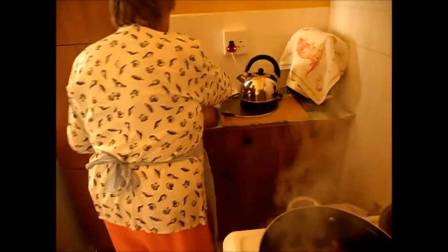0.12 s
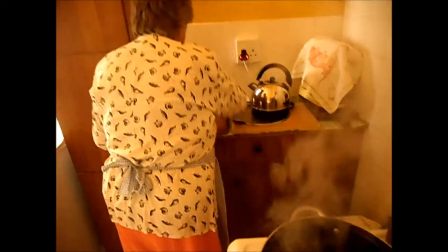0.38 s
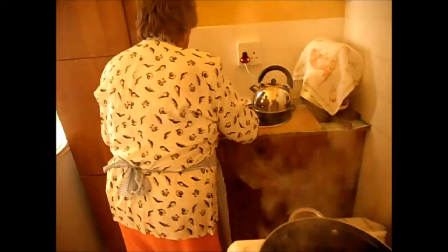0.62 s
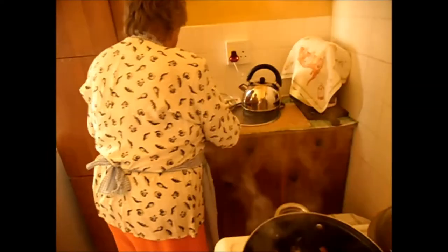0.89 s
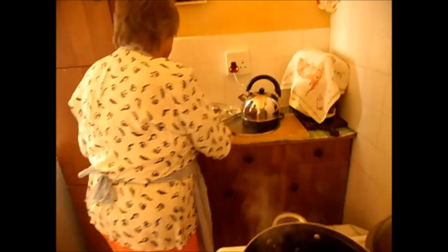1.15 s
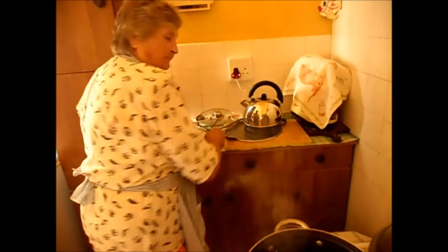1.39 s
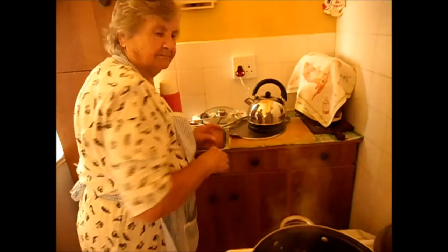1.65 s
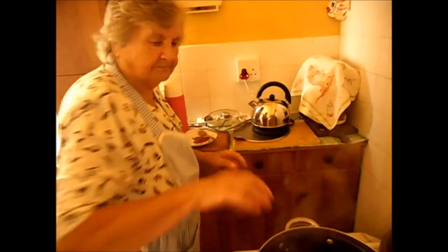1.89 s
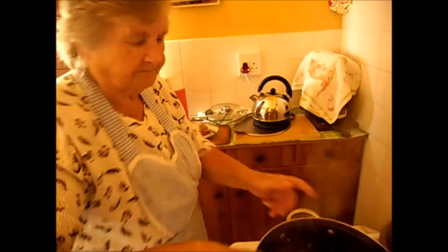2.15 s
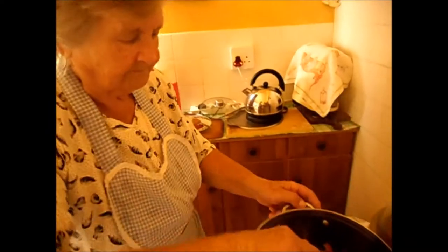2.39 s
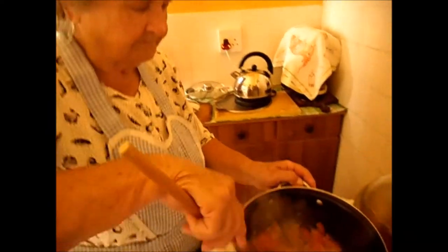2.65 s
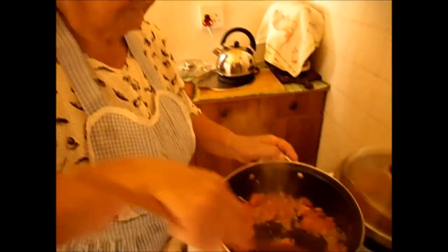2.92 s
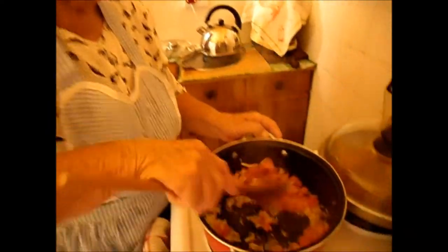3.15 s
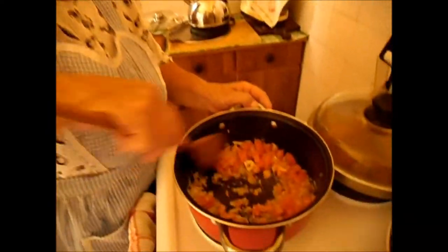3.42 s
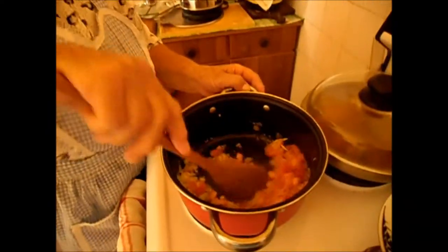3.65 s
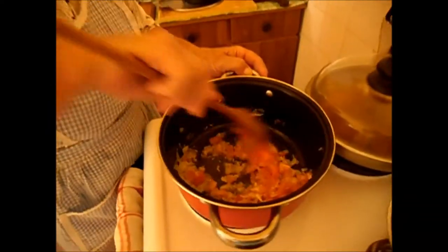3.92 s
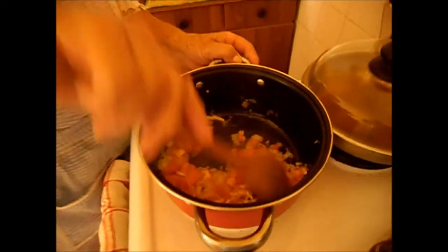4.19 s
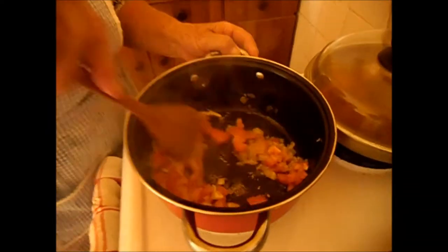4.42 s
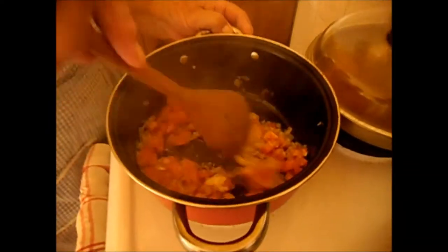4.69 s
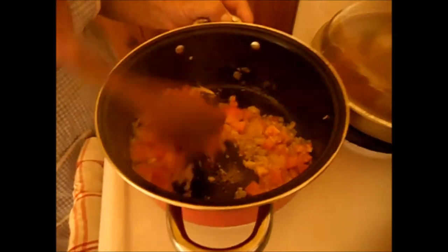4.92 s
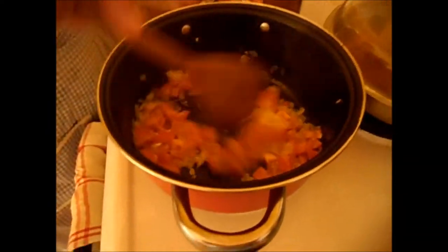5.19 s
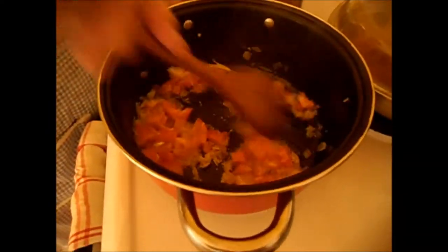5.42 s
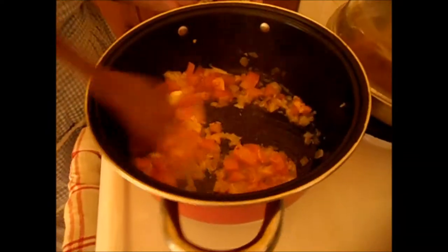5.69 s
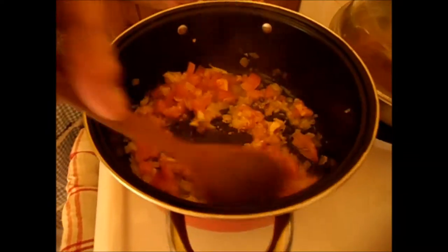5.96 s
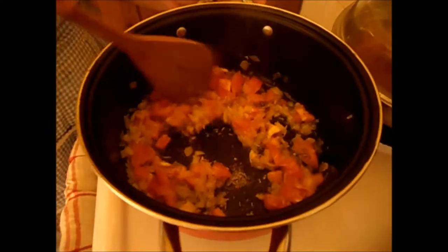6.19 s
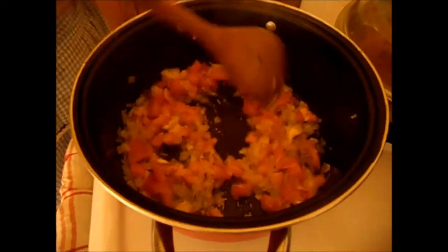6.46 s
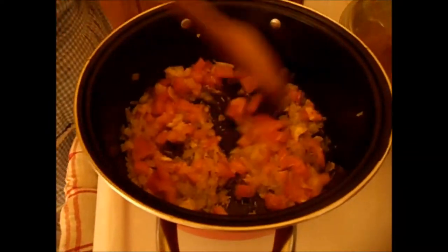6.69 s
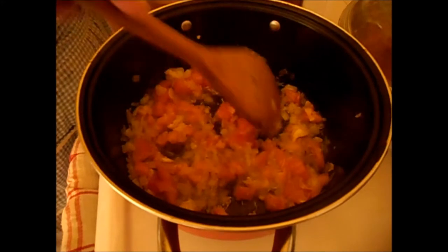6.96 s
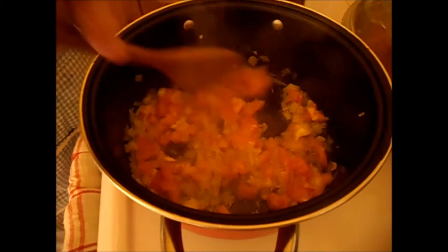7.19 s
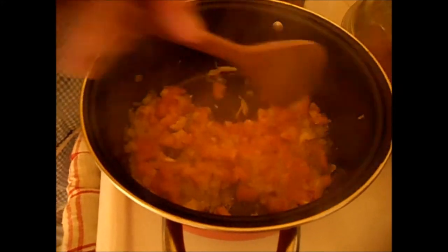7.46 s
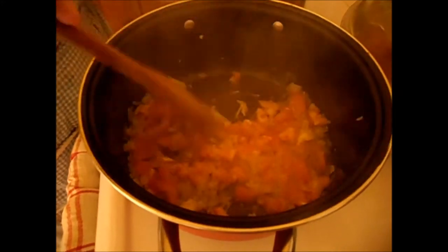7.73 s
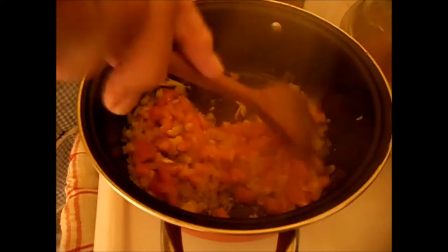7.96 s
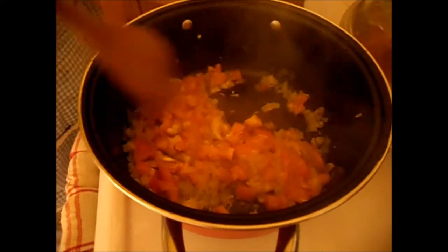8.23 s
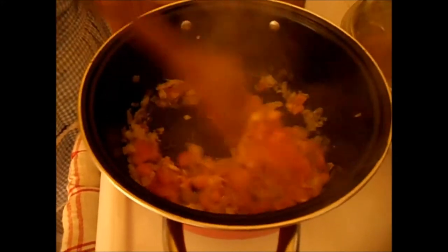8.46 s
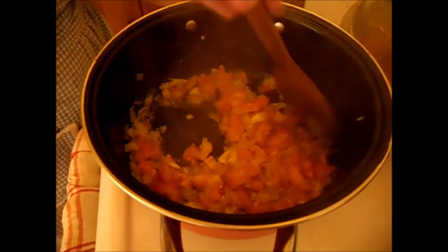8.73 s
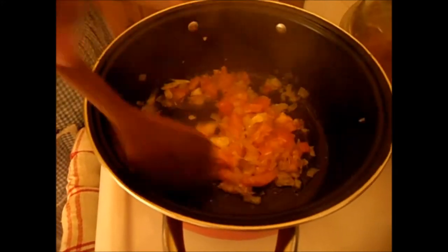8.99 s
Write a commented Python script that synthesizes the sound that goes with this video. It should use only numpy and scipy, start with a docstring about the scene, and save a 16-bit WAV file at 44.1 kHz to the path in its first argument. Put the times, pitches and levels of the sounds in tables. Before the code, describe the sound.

Vegetables sizzle steadily in oil in a metal pot while crockery clinks onto a wooden counter, then a wooden spoon knocks and clanks against the pot.

```python
"""Vegetables sizzle in oil in a metal pot: dense random bubble clicks and hiss, filtered for far and near.
The place is a tiled kitchen with a short noise tail; a small mono camera moves up close to the pot.
At first crockery, as ringing modes and noise bursts, is set down on a wooden counter, and lone oil pops
stand out as brief sine pulses. Then a wooden spoon stirs, striking the modes of the pot wall and floor.
The camera microphone stops near 8 kHz and the hardest knocks overload it."""
import sys
import numpy as np
from scipy import signal
from scipy.fft import rfft, irfft, next_fast_len
from scipy.io import wavfile
from scipy.ndimage import uniform_filter1d

SR = 44100
rng = np.random.default_rng(int(sys.argv[2]) if len(sys.argv) > 2 else 0)


def put_to_file(sound):
    """Save the sound as 16-bit audio at rate SR, in the file named by the first command-line argument."""
    columns = np.atleast_2d(sound).T  # one column per channel
    safe = np.clip(columns, -1, 1)
    whole_steps = np.round(safe * 32767)
    wavfile.write(sys.argv[1], SR, whole_steps.astype(np.int16))


def gain_from_db(level_db):
    """Convert decibel levels to linear amplitude factors (20 dB per decade)."""
    decades = np.asarray(level_db, float) / 20
    return 10 ** decades


N = 401483
TIME_S = np.arange(N) / SR

# frying level over time: time_s, fizz_db, simmer_db
FRYING_LEVELS = [(0.0, -41.5, -51), (0.88, -39, -50.5), (1.27, -41, -51.5), (2.2, -40.5, -51.5),
                 (2.36, -42.5, -50), (2.86, -33.5, -44.5), (3.9, -32, -45.5), (4.2, -30, -43.5),
                 (5.22, -28.5, -44.5), (5.75, -29.5, -41.5), (6.18, -28, -42.5), (6.79, -29, -43),
                 (7.98, -30, -42), (8.29, -28.5, -43), (9.1, -29, -41.5)]
# spectrum of the fizz from across the room: frequency_hz, density_db (per Hz)
FAR_FIZZ = [(820, -45.5), (1400, -32), (1940, -4), (2210, -32), (2390, 3), (2820, -5), (5960, -9.5),
            (7120, -2), (7700, 9.5), (10000, -27.5), (16900, -120)]
# spectrum of the fizz from just above the pot: frequency_hz, density_db (per Hz)
NEAR_FIZZ = [(820, -53.5), (1400, -14.5), (1490, -45), (1810, -9.5), (1970, -19.5), (2090, -1.5),
             (2290, -5.5), (2550, -5), (2980, -0.5), (3230, -3), (4230, 0.5), (4570, -2.5), (7070, -0.5),
             (7480, 6), (7700, -8.5), (10000, -38), (16900, -120)]
# spectrum of the lower wet simmer: frequency_hz, density_db (per Hz)
SIMMER_SPECTRUM = [(180, -68), (300, -29), (334, -5.5), (388, -25), (547, -1), (809, -6), (1120, -1.5),
                   (1970, -3.5), (2200, -6), (2860, -18.5), (4840, -120)]
# the camera comes up to the pot between two times; closeness 0-1 before and after
APPROACH_S, CLOSENESS = (2.25, 2.75), (0.56, 0.8)

# the loudest oil pops: start_s, peak_db, pitch_hz
LOUD_POPS = [(0.4644, -32, 6300), (0.5262, -25.5, 5750), (0.9572, -32, 4530), (1.5449, -24.5, 7200),
             (1.5617, -25, 5180), (1.6312, -22.5, 4700), (1.704, -20, 7000), (1.736, -25, 6070),
             (1.8704, -25.5, 6300), (1.9225, -23.5, 5730), (2.0627, -22, 4760), (2.3316, -25.5, 4260),
             (2.4274, -25, 5820), (2.7244, -22, 5270), (2.785, -22, 4660), (8.3954, -30, 4240)]
SMALL_POPS_PER_S, SMALL_POPS_UNTIL_S = 4, 2.8
# scatter is the most that a small pop lies above or below the middle level
SMALL_POPS_DB, SMALL_POPS_SCATTER_DB, SMALL_POPS_HZ = -31, 3, (3200, 6500)

# spoon on pot, and how freely the metal rings (food or hand chokes it):
# start_s, clank_db, thud_db, wall_ring_db (peak in each region), free (0-1)
SPOON_KNOCKS = [(2.2224, -24, -19, -18.5, 0.45), (2.634, -38, -20.5, -23, 0.68),
                (2.879, -50, -32.5, -41, 0.9), (3.0, -39, -30.5, -43, 1), (3.4682, -1.5, -25, -24, 0.94),
                (3.628, -34, -38, -33.5, 0.7), (3.8281, -7.5, -24.5, -26.5, 0.95),
                (4.2401, -6, -21.5, -17, 0.96), (4.29, -51, -26, -52, 1), (4.595, -23, -24.5, -52, 0.7),
                (4.8315, 3.5, -19, -17, 0.96), (5.0835, -8, -16, -12.5, 0.87),
                (5.4153, -19.5, -19.5, -47, 0.4), (5.7065, -8.5, -20, -30, 0.51),
                (5.7478, -10.5, -11.5, -37, 0.21), (5.9834, -3.5, -24, -18, 1),
                (6.3203, -12.5, -21.5, -20, 0.21), (6.8628, -12.5, -10, -24, 0.51),
                (7.1587, 2.5, -24.5, -24, 0.91), (7.5432, -14, -22.5, -19, 1), (7.64, -10, -15, -13, 0),
                (8.0294, -22.5, -21, -46, 0.1), (8.328, 5.5, -20.5, -19.5, 0.75),
                (8.368, -19, -22.5, -25.5, 0.5), (8.7106, -12, -32, -36.5, 0.95)]
# regions of pot modes, in order clank, thud, wall ring, bright, tick: low_hz, high_hz
POT_REGIONS_HZ = [(1420, 2600), (400, 1000), (1000, 1420), (2600, 4000), (4000, 7600)]
# pot modes, one value each: pitch_hz
POT_MODES_HZ = [570, 690, 812, 1116, 1344, 1522, 1755, 1960, 1995, 2218, 2362, 2745, 2850, 3250, 3465, 3860,
                4260, 4605, 4760, 4945, 5044, 5147, 6412, 6845]
# pot modes, one value each: level_db before the scatter of each blow
POT_MODES_DB = [-2.5, -0.5, -5, -2, -10.5, -7.5, 3.5, -8.5, -1.5, -7.5, -6, -7.5, -2.5, -12, -0.5, -22, -10,
                -1, -5.5, -5.5, -6.5, -7.5, -16, -2.5]
# pot modes, one value each: t60_s when quite free
POT_MODES_T60_S = [.07, .24, .2, .4, .13, .12, .12, .28, .11, .09, .11, .14, .09, .06, .13, .09, .07, .1,
                   .09, .11, .12, .1, .08, .07]
# wooden crack that comes with each region: low_hz, high_hz, level_db over a free ring, t60_s when free
WOODEN_CRACK = [(1638, 2640, 1.5, 0.033), (424, 950, -2, 0.11), (980, 1430, 0, 0.2), (2880, 4460, 0, 0.17),
                (3540, 7000, -1.5, 0.042)]
# the two top regions follow the lower ones:
# db when free, db per db of clank, db per db of wall ring, db lost when fully choked
BRIGHT, TICK = (1.4, 0.37, 0.52, 5.2), (8.3, 1.17, 0.13, 62)
# the next touch of the spoon stills what is left of a ring
CHOKE_T60_S = 0.05
# modes have a close twin, a little elsewhere for each blow: spread and share at TWIN_REF_HZ and above;
# lower modes have closer, weaker twins
BEAT_HZ, BEAT_SHARE, TWIN_REF_HZ = 60, 0.7, 4000

# crockery set down, with its bounces:
# start_s, counter_db, clatter_db, china_ring_db, free (share of full ring time, 0-1)
DISH_CONTACTS = [(0.288, -25.5, -26, -11.5, 0.25), (.312, -18.5, -15.5, -17.5, 0.58),
                 (.718, -27.5, -31, -35.5, 0.6), (0.7215, -21.5, -14.5, -17.5, 0.47),
                 (.728, -43.5, -10.5, -9, 0.63), (0.7347, -40, -17, -15.5, 1),
                 (.765, -36, -18.5, -12, 0.87)]
# wooden counter modes: pitch_hz, level_db, t60_s when free
COUNTER_MODES = [(593, 0, .3), (719, 15, 0.27), (1010, -19, 0.23)]
# china modes: pitch_hz, level_db, t60_s when free
CHINA_MODES = [(1475, -5, .5), (1863, -3, .45), (1970, -3, .5), (2283, -6, .4), (2665, -6, .25),
               (3095, -5, .35), (3354, -3, .36), (3677, -7, .35), (4161, -8, .35), (4630, -2, .42),
               (5367, -6, .45), (6202, -6, .45), (6907, -5, .3)]
# low bumps through counter, stove and handle: start_s, level_db, pitch_hz, t60_s
LOW_BUMPS = [(0.287, -27, 136, 0.51), (0.311, -25, 188.5, 0.41), (0.723, -28, 216, 0.27),
             (2.221, -34, 257, 0.2), (2.33, -40, 163, 0.13), (2.874, -34, 246, 0.26),
             (3.994, -33.5, 93.6, 0.38), (4.596, -32, 92.5, 0.1), (6.865, -13, 313, 0.06),
             (7.155, -32, 299, 0.18), (8.499, -34, 72.7, 0.17)]

# sends to the room tail, from the pot side and from the far counter
ROOM_T60_S, NEAR_ROOM_DB, FAR_ROOM_DB = 0.47, -19, -11
# low rumble of the hand-held camera and the stove at rest, about which it wanders:
# (deep_db, upper_db) across the room and at the pot
REST_FAR, REST_NEAR = (-60.5, -66), (-59, -56)
# lurches of the rumble, at their height: time_s, deep_db, upper_db
RUMBLE_LURCHES = [(0.33, -40, -39.5), (0.79, -43, -51), (2.34, -47, -38.5), (2.46, -44, -47),
                  (2.81, -61, -61), (3.14, -54, -53), (3.47, -64, -43.5), (4.0, -49, -39.5),
                  (4.33, -50, -43), (4.89, -42.5, -46), (5.14, -41.5, -42.5), (5.75, -38, -44),
                  (5.84, -37, -40.5), (6.03, -41.5, -48), (6.33, -44, -43), (6.72, -49, -62),
                  (6.871, -44, -60), (7.17, -62, -49), (7.63, -44, -45), (8.06, -53, -44), (8.31, -45, -51),
                  (8.51, -47, -43), (8.69, -49, -64)]
LURCH_RISE_DB_PER_S, LURCH_FALL_DB_PER_S = 260, 120
ROOM_TONE_DB, ROOM_TONE_HZ = -63, (170, 480)
# the microphone is silent from here up
TOP_HZ = 8745


def band(x, lo_hz, hi_hz):
    """Causal band-pass."""
    return signal.sosfilt(signal.butter(N=2, Wn=[lo_hz, hi_hz], btype="band", fs=SR, output="sos"), x)


def unit(x):
    """Scale to rms 1."""
    return x / np.sqrt(np.mean(x ** 2))


def colour(x, table):
    """Filter x by a curve of (Hz, dB) points, then scale to rms 1."""
    hz, db = np.transpose(table)
    size = next_fast_len(N)
    f = np.maximum(np.arange(size // 2 + 1) * SR / size, 1)
    gain = gain_from_db(np.interp(np.log(f), np.log(hz), db))
    return unit(irfft(rfft(x, size) * gain, size)[:N])


def curves(table):
    """Columns of a timed table, one value a sample."""
    s, *columns = np.transpose(table)
    return [np.interp(TIME_S, s, c) for c in columns]


def fade(t60, t):
    """Falls 60 dB in t60 seconds."""
    return np.exp(-np.log(1000) * t / max(t60, .001))


def add(out, s, x):
    """Mix x into out from time s."""
    i = int(s * SR)
    out[i:i + len(x)] += x[:N - i]


def walk(rate):
    """Random levels held 1 / rate s and slewed twice; spread near 1."""
    k = int(SR / rate)
    held = np.repeat(rng.standard_normal(N // k + 1), k)
    return 1.32 * uniform_filter1d(uniform_filter1d(held, k), k)[:N]


def ring(modes, t, scatter_db, free):
    """Struck modes in beating pairs, peak 1; each blow weights them anew and free scales the ring time."""
    x = 0
    for hz, db, t60 in modes:
        size, apart = rng.standard_normal(2)
        high = min(hz / TWIN_REF_HZ, 1)
        twin_hz = hz + BEAT_HZ * high * apart
        pair = np.sin(2 * np.pi * hz * t) + BEAT_SHARE * high * np.sin(2 * np.pi * twin_hz * t)
        x = x + gain_from_db(db + scatter_db * size) * fade(free * t60, t) * pair
    return x / np.abs(x).max()


def burst(lo_hz, hi_hz, t60, t):
    """A sharp tick that trails off in a band of noise, peak 1."""
    push = rng.standard_normal(len(t)) * fade(t60, t)
    push[0] = 8.4
    x = band(push, lo_hz, hi_hz)
    return x / np.abs(x).max()


def flicker(x, depth_db, rate):
    """Overlapping third-octave parts of x, from 1 kHz up, each waver in level on their own."""
    size = next_fast_len(N)
    spectrum = rfft(x, size)
    hz = np.maximum(np.arange(len(spectrum)) * SR / size, 1)
    step = 3 * np.log2(hz / 1000)
    parts = (irfft(spectrum * np.clip(1 - np.abs(step - k), 0, 1), size)[:N] for k in range(11))
    return sum(gain_from_db(depth_db * walk(rate)) * part for part in parts)


def bubbles(per_s, spread_db, hiss):
    """Steam bubbles bursting through oil: dense clicks of uneven size over a smooth hiss."""
    where = rng.random(N) < per_s / SR
    push = where * rng.standard_normal(N)
    clicks = push * gain_from_db(spread_db * np.minimum(rng.exponential(size=N), 4))
    return unit(clicks) + hiss * rng.standard_normal(N)


def frying():
    """Fizz sparser from afar, shaped by the pot's hollow up close, over a lower wet simmer."""
    fizz_db, simmer_db = curves(FRYING_LEVELS)
    close = np.clip(np.interp(TIME_S, APPROACH_S, CLOSENESS), 0, 1)
    far = colour(bubbles(690, 3.1, 0.38), FAR_FIZZ)
    near = colour(bubbles(1800, 3.4, 1.96), NEAR_FIZZ)
    blend = np.sqrt(1 - close) * far + np.sqrt(close) * near
    fizz = flicker(blend, 0.48, 8) * gain_from_db(0.8 * walk(25))
    simmer = colour(bubbles(500, 3.2, 1.8), SIMMER_SPECTRUM) * gain_from_db(0.21 * walk(9.5))
    return gain_from_db(fizz_db) * unit(fizz) + gain_from_db(simmer_db) * simmer


def pops():
    """Each pop is a few cycles of a small bubble that swells and collapses; small ones come at random."""
    out, t = np.zeros(N), TIME_S[:SR // 50]
    count = int(SMALL_POPS_PER_S * SMALL_POPS_UNTIL_S)
    when, pitch, size = rng.random((count, 3)).T
    small_db = SMALL_POPS_DB + 2 * SMALL_POPS_SCATTER_DB * (size - .5)
    small = zip(when * SMALL_POPS_UNTIL_S, small_db, np.interp(pitch, (0, 1), SMALL_POPS_HZ))
    for s, db, hz in [*LOUD_POPS, *small]:
        # the swell is at its height after 1.6 cycles
        u = t * hz / 1.6
        add(out, s, gain_from_db(db) * u * np.exp(1 - u) * np.sin(2 * np.pi * hz * t))
    return out


def spoon():
    """Where the spoon lands sets how hard each region of pot modes rings; a wooden crack starts it."""
    out, t = np.zeros(N), TIME_S[:SR // 2]
    pot = list(zip(POT_MODES_HZ, POT_MODES_DB, POT_MODES_T60_S))
    next_starts = [knock[0] for knock in SPOON_KNOCKS[1:]] + [N / SR]
    for (s, clank_db, thud_db, wall_db, free), next_s in zip(SPOON_KNOCKS, next_starts):
        free = np.clip(free, .08, 1.2)
        stilled = fade(CHOKE_T60_S, np.maximum(t - (next_s - s), 0))
        top_db = [db + a * clank_db + b * wall_db - choke_db * (1 - free)
                  for db, a, b, choke_db in (BRIGHT, TICK)]
        levels_db = [clank_db, thud_db, wall_db, *top_db]
        for (lo, hi), db, crack in zip(POT_REGIONS_HZ, levels_db, WOODEN_CRACK):
            lo_hz, hi_hz, crack_db, t60 = crack
            metal = free * ring([m for m in pot if lo <= m[0] < hi], t, 2.5, free)
            x = metal + gain_from_db(crack_db) * burst(lo_hz, hi_hz, free * t60, t)
            add(out, s, gain_from_db(db) * stilled * x / np.abs(x).max())
    # the knocks carry nothing below about 420 Hz
    return band(out, 420, 21000)


def crockery():
    """The counter knocks, the contact clatters, the china rings on."""
    out, t = np.zeros(N), TIME_S[:SR * 3 // 4]
    low = [m for m in CHINA_MODES if m[0] < 3000]
    high = [m for m in CHINA_MODES if m[0] >= 3000]
    for s, counter_db, clatter_db, china_db, free in DISH_CONTACTS:
        # a held dish gives a duller tick and hardly rings
        free = np.clip(free, .05, 1.1)
        knock = 0.36 * ring(COUNTER_MODES, t, 1.9, free) + 0.64 * burst(330, 1540, 0.44 * free, t)
        clatter = 0.29 * free * ring(low, t, 1.1, free) + .8 * burst(830, 4100, 0.35 * free, t)
        tick = burst(2800, 3300 + 4800 * free, .22 * free, t)
        china = 1.2 * free * ring(high, t, 1.6, free) + .6 * tick
        add(out, s, gain_from_db(counter_db) * knock)
        add(out, s, gain_from_db(clatter_db) * clatter)
        add(out, s, gain_from_db(china_db) * china)
    return out


def bumps():
    """Bumps through counter, stove and handle: a low decaying boom with a rough edge of noise."""
    out, t = np.zeros(N), TIME_S[:SR // 2]
    for s, db, hz, t60 in LOW_BUMPS:
        boom = fade(t60, t) * np.sin(2 * np.pi * hz * t)
        add(out, s, gain_from_db(db) * (0.63 * boom + 0.5 * burst(0.51 * hz, 1.87 * hz, t60, t)))
    return out


def room(near, far):
    """Short tiled-room tail that builds after a few milliseconds; the far counter gets more of it."""
    t = TIME_S[:SR // 2]
    noise = band(rng.standard_normal(len(t)), 140, 3700)
    tail = noise * fade(ROOM_T60_S, t) * (1 - np.exp(-t / .004))
    send = gain_from_db(NEAR_ROOM_DB) * near + gain_from_db(FAR_ROOM_DB) * far
    return signal.fftconvolve(send, tail / np.sqrt(np.sum(tail ** 2)))[:N]


def rumble():
    """Low noise in two bands lurches as the camera moves, climbing fast and sinking slower; a room tone."""
    deep_db, upper_db = (np.interp(TIME_S, APPROACH_S, pair) + 2.7 * walk(4.6)
                         for pair in zip(REST_FAR, REST_NEAR))
    for s, deep_top_db, upper_top_db in RUMBLE_LURCHES:
        slope = np.where(TIME_S < s, LURCH_RISE_DB_PER_S, LURCH_FALL_DB_PER_S)
        below_db = slope * np.abs(TIME_S - s)
        deep_db = np.maximum(deep_db, deep_top_db - below_db)
        upper_db = np.maximum(upper_db, upper_top_db - below_db)
    deep = unit(band(rng.standard_normal(N), 12, 52))
    upper = unit(band(rng.standard_normal(N), 75, 270) * gain_from_db(2.5 * walk(30)))
    tone = unit(band(rng.standard_normal(N), *ROOM_TONE_HZ))
    return gain_from_db(deep_db) * deep + gain_from_db(upper_db) * upper + gain_from_db(ROOM_TONE_DB) * tone


def scene():
    """Pot and counter with their room tail, over frying and rumble; the same mono in both channels."""
    near, far = spoon() + pops() + bumps(), crockery()
    mono = near + far + room(near, far) + frying() + rumble()
    return np.array([mono, mono])


def low_pass(x):
    """Removes everything above the highest recorded frequency."""
    return signal.sosfilt(signal.butter(12, 7880, fs=SR, output="sos"), x)


def record(dry):
    """The camera microphone: a steep top cut, then the hardest knocks hit full scale."""
    cut = signal.sosfilt(signal.cheby2(N=12, rs=70, Wn=TOP_HZ, fs=SR, output="sos"), dry)
    overloaded = np.clip(cut, -1, 1)
    return low_pass(overloaded)


dry = scene()
out = record(dry)
put_to_file(out)
```